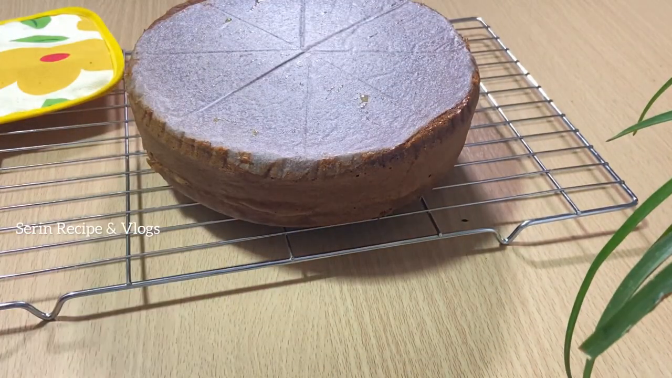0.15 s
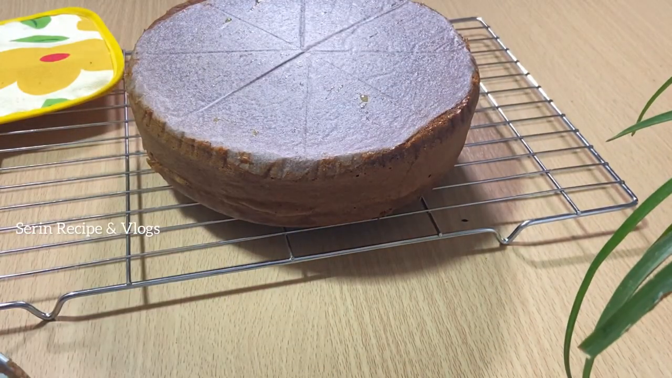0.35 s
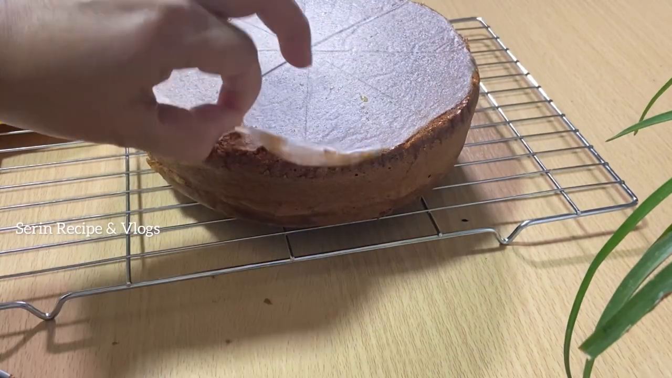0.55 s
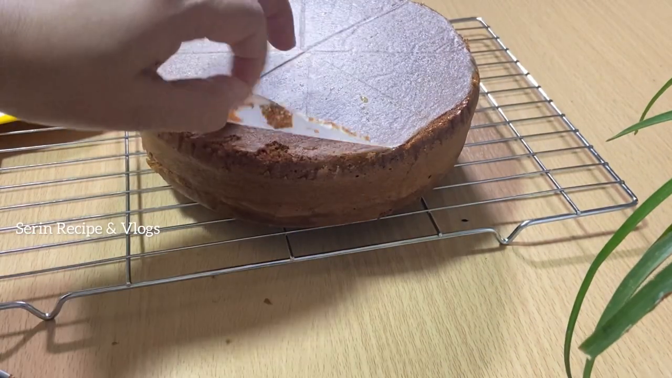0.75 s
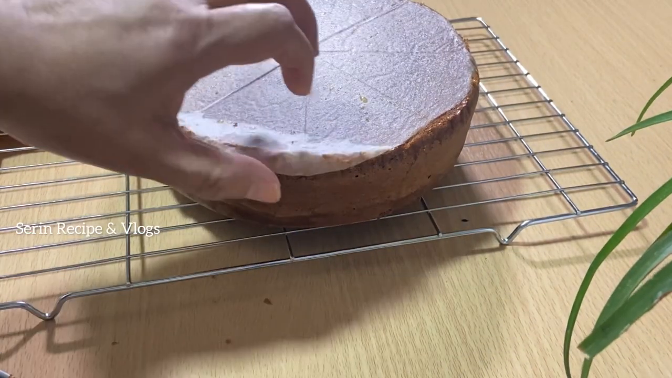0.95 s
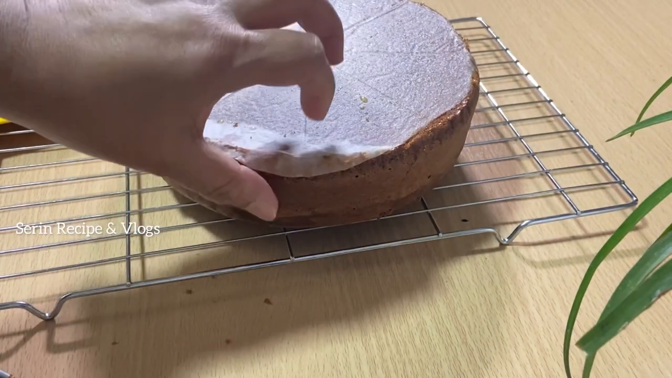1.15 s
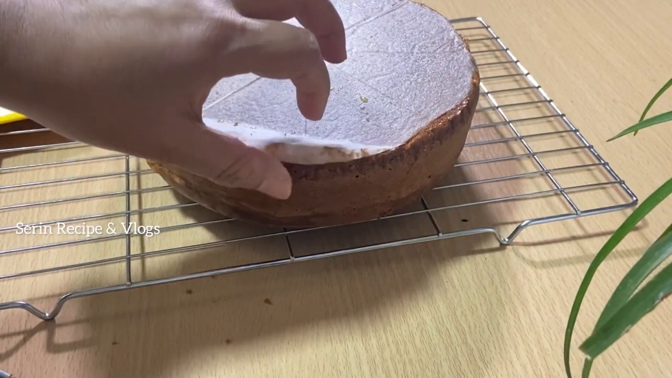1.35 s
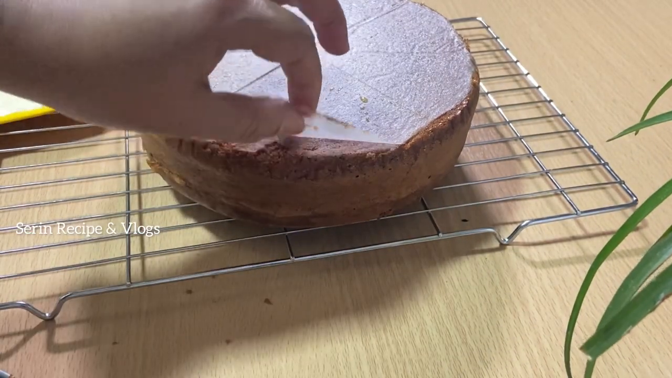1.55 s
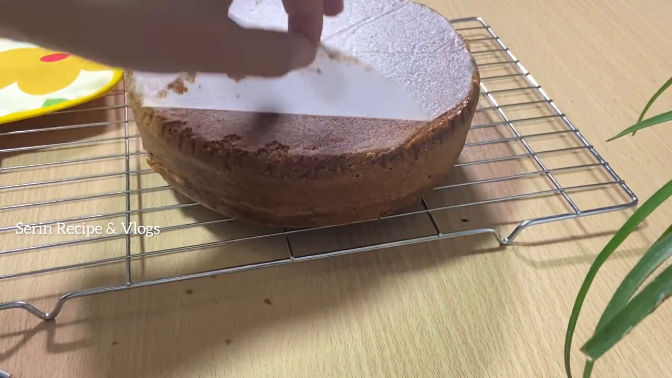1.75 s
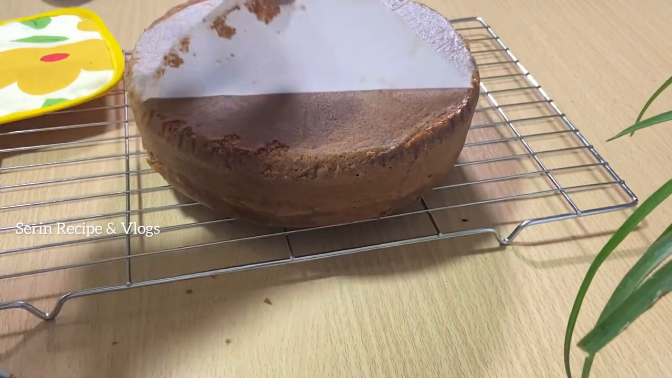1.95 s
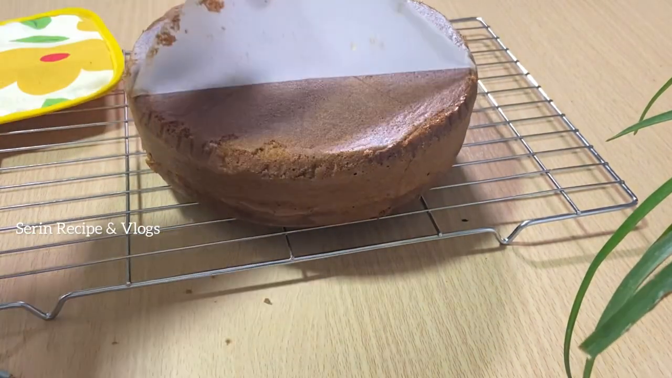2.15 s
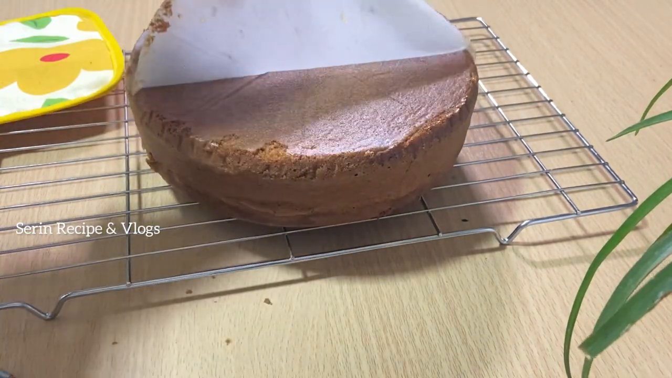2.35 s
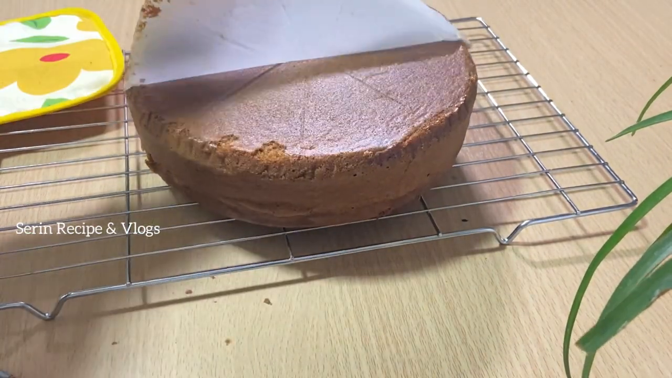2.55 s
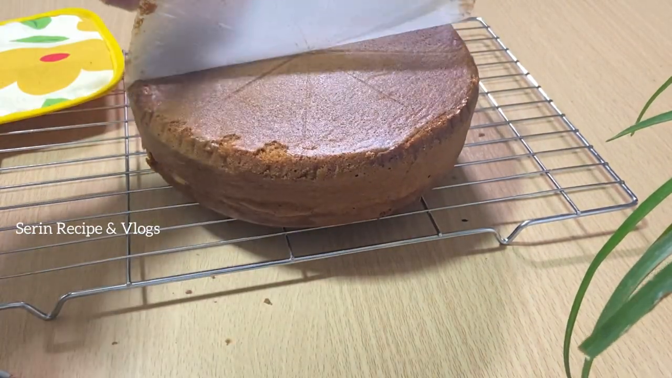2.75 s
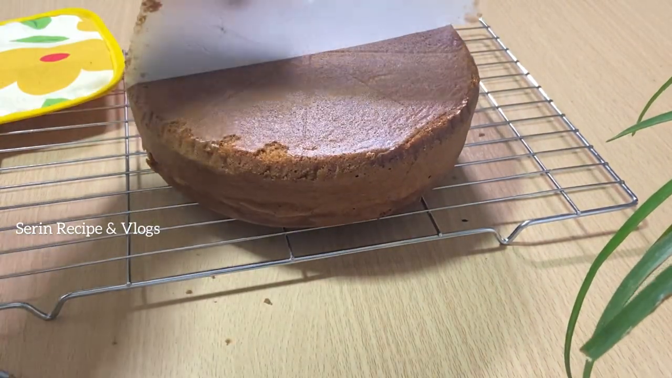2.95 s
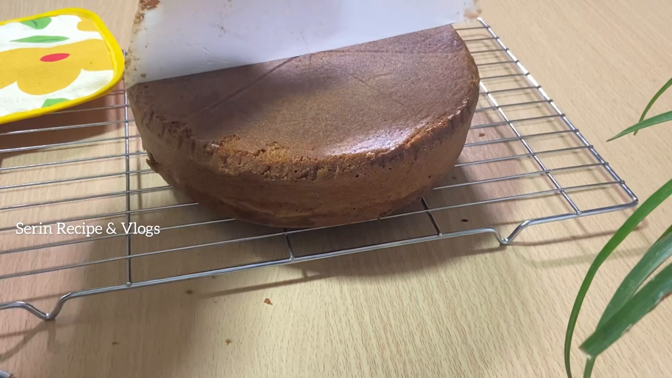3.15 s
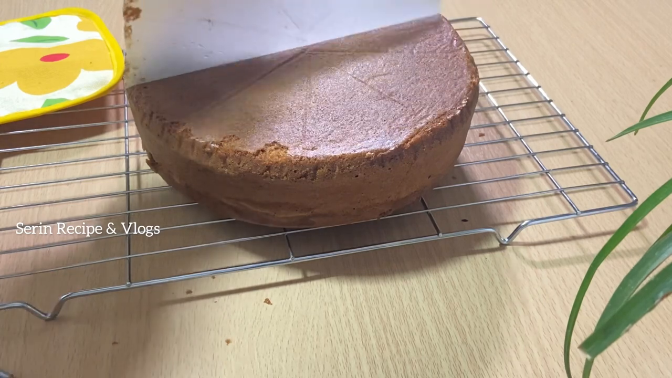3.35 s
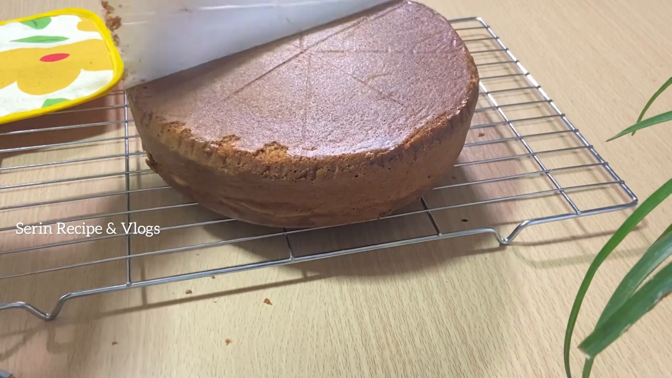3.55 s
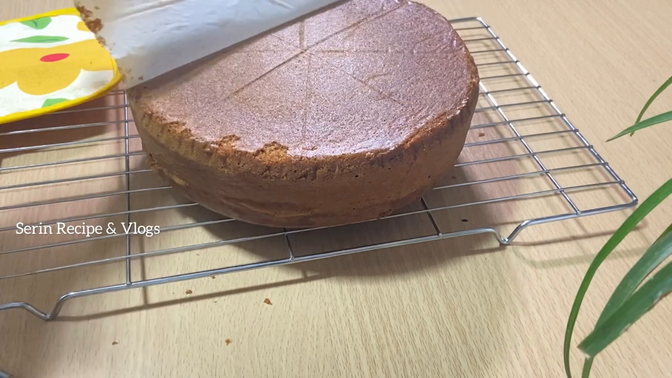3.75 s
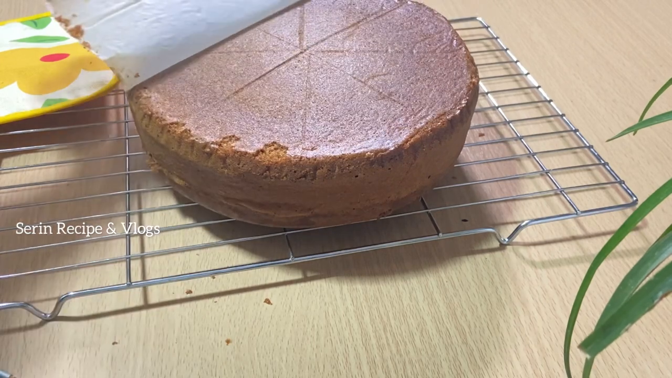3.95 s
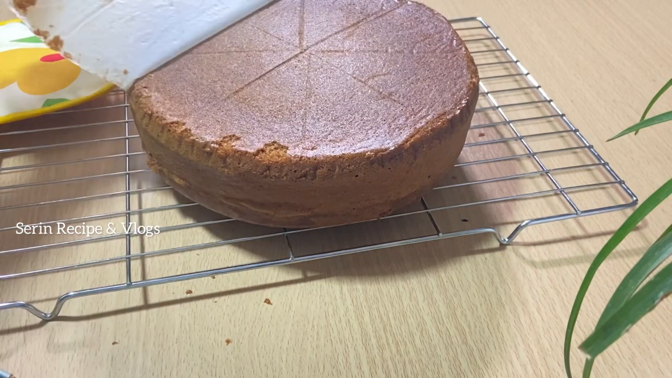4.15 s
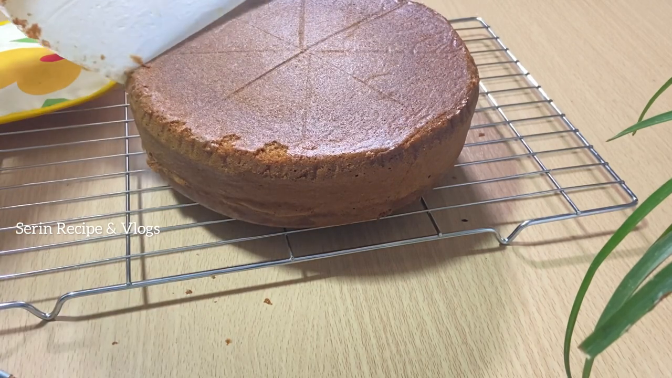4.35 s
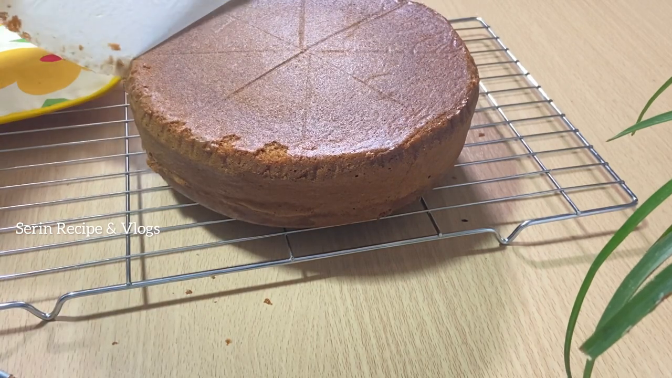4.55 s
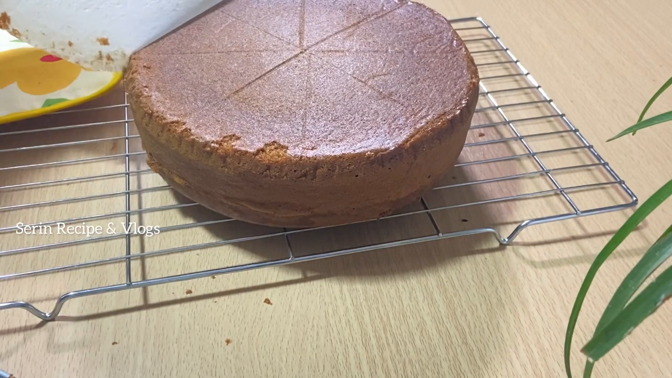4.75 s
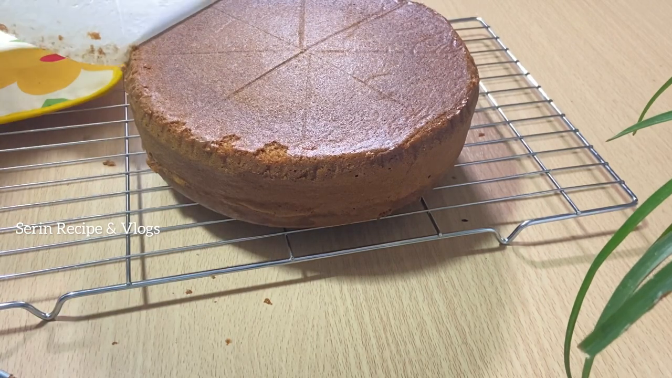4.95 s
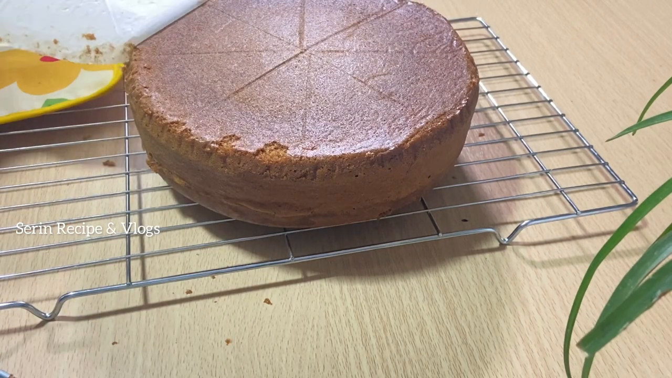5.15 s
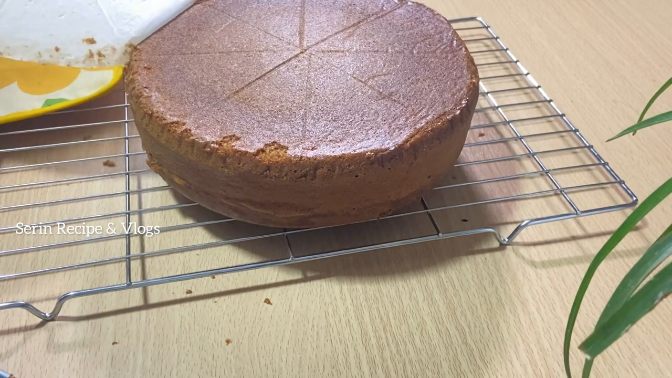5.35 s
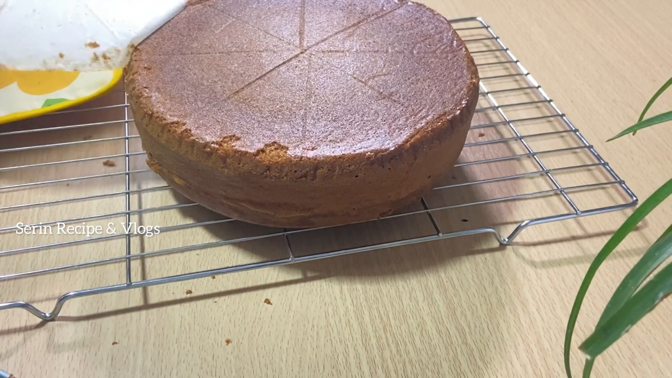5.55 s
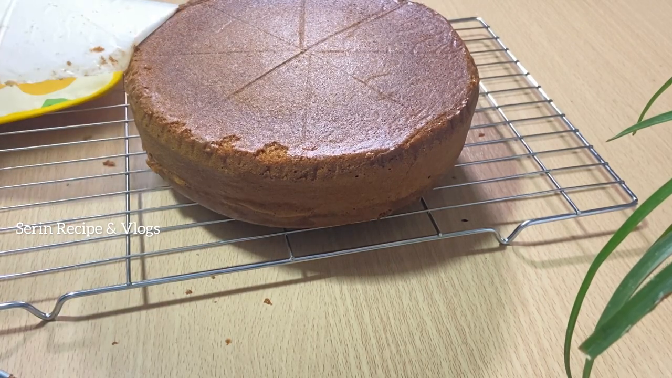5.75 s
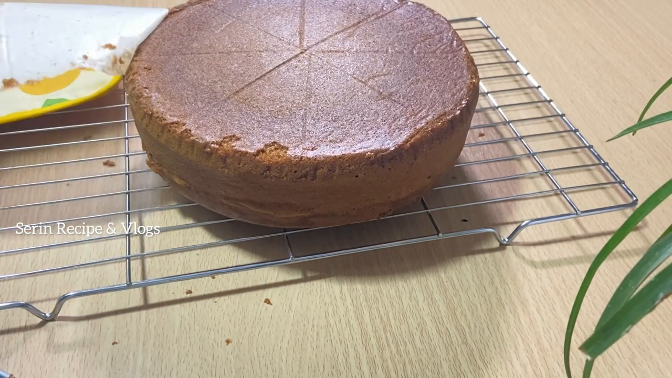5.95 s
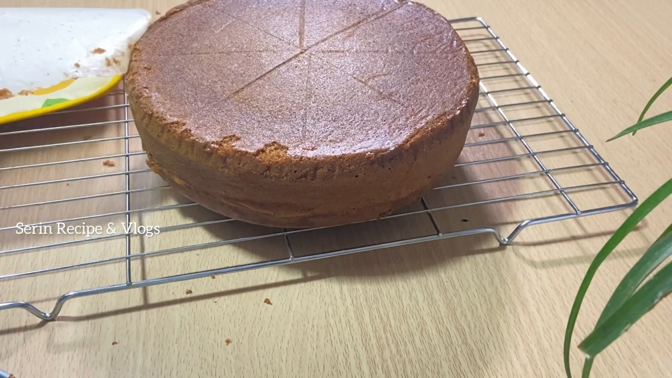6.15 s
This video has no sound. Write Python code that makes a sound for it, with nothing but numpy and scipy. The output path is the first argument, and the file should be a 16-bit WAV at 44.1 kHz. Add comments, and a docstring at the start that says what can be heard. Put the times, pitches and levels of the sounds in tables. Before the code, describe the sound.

Baking paper crackles and rustles close to the microphone as it is pulled from a cake in uneven tugs. It starts after near silence and a brief knock, is busiest in the middle and fades to a few light crinkles. Now and then the table gives a dull thud and the sheet a hollow tap. A fridge hums softly under a low, steady background rumble in the small kitchen.

```python
"""Baking paper is peeled off a cake, close to a two-port microphone in a small kitchen.
The sheet snaps where its creases buckle, and rustles as many tiny stuck spots let go.
The table thuds, hand and sheet make hollow taps, and a fridge hums in soft background noise.
The first half second is hushed and ends on a knock that stops dead; then the sound goes on louder."""
import sys
import numpy as np
from scipy import signal
from scipy.fft import rfft, irfft
from scipy.io import wavfile
from scipy.ndimage import uniform_filter1d

SR = 44100
rng = np.random.default_rng(int(sys.argv[2]) if len(sys.argv) > 2 else 0)


def store_wav(level_fs):
    """Save 16-bit WAV to argv[1]."""
    pcm = np.round(np.clip(np.atleast_2d(level_fs), -1, 1) * 32767)
    wavfile.write(sys.argv[1], SR, pcm.T.astype(np.int16))


N = 277609
TIME, FFT_SIZE = np.arange(N) / SR, 2 ** 19
HUSH_END_S, HUSH_DB = 0.561, -17.5
BODY_HZ, CRISP_HZ = 1120, 8200  # where the paper's low body ends and its crisp top begins

# The tone of the sheet, for snaps and rustle alike: f/Hz, level/dB
PAPER_TONE = [(100, 3), (350, 2.5), (900, -5), (1250, -10.5), (1520, -3), (2700, -2), (3500, -3.5),
              (4400, -3), (6500, -2.5), (11000, -4), (15500, -10)]
# Creases buckling: t/s, peak level of the middle band/dB, ring f/Hz, crisp top against that level/dB
CREASE_SNAPS = [(0.718, -36, 2700, -18), (0.7259, -36.5, 2330, -2), (0.866, -47, 1760, -17),
                (0.953, -58, 4000, -1), (1.0828, -49, 2900, -5), (1.153, -67, 6660, 10),
                (1.2545, -56, 4900, -8), (1.263, -53.5, 1500, -18), (1.3133, -43.5, 4140, -4),
                (1.413, -39, 6800, -9), (1.4223, -35, 4380, -23), (1.5177, -40, 5950, 0.5),
                (1.538, -40, 2980, -23), (1.555, -32, 3030, -19), (1.564, -27.5, 3120, -6),
                (1.5716, -24.5, 3330, -14), (1.752, -39, 2770, -25), (1.785, -36.5, 6450, 6.5),
                (1.8511, -41, 2340, 3.5), (1.9297, -40, 2240, -27), (2.004, -41, 2070, -2),
                (2.0342, -24.5, 4570, 3), (2.1331, -31.5, 2240, -1), (2.1775, -30.5, 2440, 2),
                (2.191, -29.5, 4000, -25), (2.2071, -31, 2090, -25), (2.266, -32.5, 1950, -14),
                (2.283, -22.5, 6560, 3.5), (2.3449, -39, 2330, 6), (2.3928, -24, 5340, -7),
                (2.4124, -28.5, 6400, -2), (2.453, -31.5, 4270, 1.5), (2.4793, -23, 2270, -21),
                (2.5166, -30.5, 2030, -4), (2.5395, -31.5, 4310, 0), (2.583, -34.5, 2930, -4),
                (2.6032, -38, 2930, 4), (2.6123, -26, 3740, -3), (2.6381, -23.5, 5100, -4),
                (2.6465, -21, 3280, 2.5), (2.7935, -38, 4400, 11), (2.8388, -26.5, 2690, -1),
                (3.044, -42, 2420, -34), (3.1657, -36, 2010, -37), (3.183, -54, 1880, -16),
                (3.2092, -35, 2230, -34), (3.215, -42, 2560, -28), (3.238, -37.5, 2600, -33),
                (3.263, -31, 2110, -12), (3.2762, -30, 2220, -24), (3.289, -28, 2820, 0),
                (3.3147, -30.5, 2830, -1), (3.3569, -27.5, 4940, -1), (3.4281, -34.5, 1880, -2),
                (3.488, -31.5, 3030, -1), (3.4936, -28, 2530, 0), (3.5157, -27.5, 2000, -14),
                (3.5428, -27.5, 1950, -25), (3.5625, -27.5, 2200, -9), (3.575, -24, 5970, 3.5),
                (3.5978, -27, 2130, 6.5), (3.6466, -30, 1800, 7), (3.6873, -25.5, 2420, -6.5),
                (3.8323, -39, 4100, 5), (3.8733, -29, 4500, 4.5), (3.9392, -31, 5200, 12.5),
                (3.9529, -29.5, 6600, 0.5), (3.991, -28, 2870, 1), (3.999, -31.5, 2900, 2),
                (4.131, -34, 4540, -12), (4.1651, -27, 6800, -10), (4.2309, -27.5, 7000, 3),
                (4.2454, -27, 4400, -9), (4.2537, -25.5, 3530, -13), (4.27, -30, 6200, -8),
                (4.324, -37.5, 5800, 5.5), (4.4121, -38.5, 6440, 0), (4.59, -38.5, 2800, -15),
                (4.603, -38, 5000, -6), (4.787, -38, 4130, -20), (4.798, -44, 4500, -8),
                (4.828, -39.5, 4230, -1), (4.842, -44, 4500, 1), (5.084, -28, 6100, 2),
                (5.238, -44, 4250, -14), (5.303, -43.5, 4540, 4.5), (5.512, -51.5, 4390, 16.5),
                (5.643, -56.5, 2200, -24), (5.94, -57, 5400, -15), (6.181, -47, 5030, -25),
                (6.205, -35.5, 1560, -19)]
def crease_snaps(ring_db=14, ring_width=0.41, uneven_db=2.5):
    """Each crease lets go in a millisecond and rings near its own pitch; folds colour each one."""
    hz, out = np.fft.rfftfreq(1024, 1 / SR), np.zeros((2, N))
    noises = rng.standard_normal((len(CREASE_SNAPS), 300))
    for (start, peak_db, ring_hz, crisp_db), noise, side in zip(CREASE_SNAPS, noises, sides(len(noises))):
        ring = np.exp(-(np.log((hz + 1) / ring_hz) / ring_width) ** 2)
        folds = np.cos(2 * np.pi * (noise[-1] + (1.5 + noise[-2] / 2) * np.log2(hz + 1)))
        tone_db = curve_at(PAPER_TONE, hz) + ring_db * ring + uneven_db * folds
        body_db = -14.5 - 3 * np.log2(ring_hz / (2 * BODY_HZ))  # higher snaps have less body
        crack = die_away(noise, fade_s=0.00062)
        for share, band_db in zip(three_bands(hz), (body_db, 0, crisp_db)):
            band = np.convolve(crack, shortest_click(tone_db + 20 * np.log10(share + 0.00069)))
            add(out, start, gain_of(peak_db + band_db) * side * band / abs(band).max())
    return out


def tiny_releases(per_s=8000, ticks_per_s=200, tick_db=13.5, spread_db=3, clump_db=2.5, kinds=16):
    """Small releases hiss in clumps and rarer big ones tick; each kind has its own ping."""
    clumps = unit_level(uniform_filter1d(uniform_filter1d(rng.standard_normal(N), 300), 300))
    chance = rng.random(N)
    size_db = spread_db * np.minimum(rng.exponential(1, N), 3.5) + clump_db * clumps
    size_db += tick_db * (chance < ticks_per_s / SR)
    releases = gain_of(size_db) * (chance < per_s / SR)
    kind, out = rng.integers(0, kinds, N), np.zeros((2, N))
    for k, (noise, side) in enumerate(zip(rng.standard_normal((kinds, 256)), sides(kinds))):
        ping_hz = BODY_HZ * (CRISP_HZ / BODY_HZ) ** (k / kinds)
        ping = die_away(np.cos(2 * np.pi * ping_hz * np.arange(256) / SR), fade_s=0.00064)
        click = unit_level(die_away(noise, fade_s=0.0007)) + 1.02 * unit_level(ping)
        out += side * signal.oaconvolve(releases * (kind == k), click)[:N]
    return out


# Pulls on the sheet: t/s, length/s, level/dB, ring of the lifted flap f/Hz, crisp top against level/dB
SHEET_TUGS = [(0.05, 0.078, -70.5, 2770, -3), (0.569, 0.033, -58.5, 3300, -3),
              (0.698, 0.05, -62.5, 2700, -11), (0.752, 0.035, -51.5, 3100, -3),
              (1.081, 0.015, -77, 3900, -13), (1.317, 0.011, -65.5, 4450, -5),
              (1.404, 0.026, -66.5, 4450, -2), (1.515, 0.016, -64.5, 3900, -12),
              (1.564, 0.065, -57, 3150, -1.5), (1.626, 0.27, -65.5, 2760, -4),
              (1.926, 0.031, -62, 2200, -8), (2.03, 0.071, -51.5, 5870, -2.5),
              (2.176, 0.023, -51.5, 4460, -5.5), (2.278, 0.043, -51, 3470, -7),
              (2.391, 0.07, -60, 4970, -8), (2.477, 0.025, -53.5, 2210, -10),
              (2.552, .04, -52.5, 3080, -11), (2.599, 0.051, -44, 1540, -7.5),
              (2.791, 0.0088, -47, 4420, -2.5), (2.938, 0.036, -60.5, 1720, -7.5),
              (3.173, 0.0076, -56, 1620, -50), (3.287, 0.087, -50, 1920, -8.5),
              (3.428, 0.027, -58, 4930, -2), (3.462, 0.079, -53.5, 2560, -8),
              (3.532, 0.051, -44.5, 2250, -13), (3.646, 0.038, -48, 1980, -5),
              (3.723, 0.079, -60.5, 3050, -9), (3.832, 0.069, -58.5, 4940, -3),
              (3.939, 0.12, -52, 5660, -1), (4.156, 0.028, -62, 6000, 0), (4.224, 0.042, -48, 3700, -3),
              (4.332, 0.032, -55, 3420, -7), (4.4, 0.14, -64, 2400, -6), (4.589, 0.039, -62, 3260, -8.5),
              (4.759, 0.081, -59, 4370, -10), (4.892, 0.11, -63, 1770, -10),
              (5.037, 0.097, -59, 6500, -1.5), (5.183, 0.071, -65, 1690, -12),
              (5.262, 0.042, -59.5, 5000, -1.5), (5.376, .16, -67, 4600, -2.5),
              (5.722, 0.39, -68, 5100, -6.5), (5.905, 0.077, -61.5, 5100, -15),
              (6.157, 0.19, -62, 2180, -7.5)]
def tugs(t, rise_db_per_s=1205, fall_db_per_s=206.5):
    """Tugs start fast, hold and settle slowly; they add up, and the strongest sets the flap's pitch."""
    start, length, held_db, flap_hz, crisp_db = np.transpose(SHEET_TUGS)[..., None]
    each_db = held_db - rise_db_per_s * np.maximum(start - t, 0)
    each_db -= fall_db_per_s * np.maximum(t - start - length, 0)
    power = gain_of(2 * np.maximum(each_db, -150))
    crisp_power = power * gain_of(2 * crisp_db)
    return 10 * np.log10(power.sum(0)), flap_hz[each_db.argmax(0), 0], 10 * np.log10(crisp_power.sum(0))


def paper_rustle(flap_db=6, usual_db=-59.5):
    """The tiny releases swell with each tug, and the lifted flap rings as its shape changes."""
    t = np.arange(0, N / SR, 0.001)
    middle_db, flap_hz, crisp_db = tugs(t)
    body_db = usual_db - 2 + 0.49 * (middle_db - usual_db)  # the body swells only half as much
    crackle = tiny_releases()
    crackle += gain_of(flap_db) * resonate(crackle, np.interp(TIME, t, flap_hz), width_hz=800)
    hz, out = np.fft.rfftfreq(FFT_SIZE, 1 / SR), np.zeros((2, N))
    spectrum = rfft(crackle, FFT_SIZE) * gain_of(curve_at(PAPER_TONE, hz))
    for share, band_db in zip(three_bands(hz), (body_db, middle_db, crisp_db)):
        band = irfft(spectrum * share)[:, :N]
        slow_power = abs(uniform_filter1d((band ** 2).mean(0), size=3000))
        steady = band / np.sqrt(slow_power + 1e-20)  # evened out, so the tugs set the level
        out += gain_of(np.interp(TIME, t, band_db)) * steady
    return out


# Low thuds of the table and higher taps of hand and sheet: t/s, level/dB, f/Hz
THUDS_AND_TAPS = [(.79, -52, 346), (1.57, -52.5, 440), (1.705, -50.5, 448), (1.93, -51, 402),
                  (2.092, -37.5, 65.5), (2.199, -42.5, 386), (2.479, -41, 149.5), (3.169, -40, 209),
                  (3.169, -47.5, 556), (3.285, -45.5, 393), (3.335, -47.5, 446), (3.476, -52, 753),
                  (3.757, -51, 579), (4.432, -32.5, 93.4), (4.441, -47, 472), (4.491, -34.5, 87),
                  (4.898, -52.5, 900), (5.12, -39.5, 82), (5.344, -56, 1004), (6.108, -54.5, 836),
                  (6.256, -53.5, 753)]
def thuds_and_taps(tap_above_hz=260, tap_fade_s=0.093, thud_cycles=17.4):
    """Each bump builds up within one swing and fades; loose paper turns higher ones into dull puffs."""
    t, out = np.arange(SR // 3) / SR, np.zeros(N)
    for start, level_db, hz in THUDS_AND_TAPS:
        noise = rng.standard_normal(len(t))
        if hz > tap_above_hz:
            puff = unit_level(resonate(noise, np.full(len(t), hz), width_hz=0.8 * hz))
            swing, fade_s = np.cos(2 * np.pi * hz * t) + puff, tap_fade_s
        else:
            swing, fade_s = np.sin(2 * np.pi * hz * t), thud_cycles / hz
        build_up = 1 - np.exp(-1.5 * hz * t)
        add(out, start, gain_of(level_db - 60 * t / fade_s) * build_up * swing)
    return out


# The notes that ring in the knock: f/Hz, relative level/dB, time to fade by 60 dB/s
KNOCK_NOTES = [(315, -10, 0.18), (900, -14, 0.22), (1480, -1.5, 0.11), (2400, 6, 0.055), (4450, 3, 0.032),
               (6840, 4, 0.012), (9800, 5.5, 0.021)]
def knock(start=0.5397, level_db=-27.5):
    """A blow and a quick bounce on a small hard thing; the ring stops dead as the hush ends."""
    t, out = np.arange(SR // 10) / SR, np.zeros(N)
    ring = sum(gain_of(db - 60 * t / fade_s) * np.sin(2 * np.pi * hz * t)
               for hz, db, fade_s in KNOCK_NOTES)
    dull_rattle = signal.lfilter([0.5], [1, -0.8], die_away(rng.standard_normal(len(t)), fade_s=0.02))
    blow = ring / abs(ring).max() + 0.39 * dull_rattle
    add(out, start, gain_of(level_db) * blow)
    add(out, start + 0.0036, gain_of(level_db - 16) * blow)  # the bounce
    return out * (TIME < HUSH_END_S)


def fridge_hum(hz=99.8, waver_hz=29, level_db=-55.5):
    """The fridge holds one low note that wavers at random."""
    smoothing = [1, -np.exp(-np.pi * waver_hz / SR)]
    noise = rng.standard_normal(N) + 1j * rng.standard_normal(N)
    waver = signal.lfilter([1], smoothing, signal.lfilter([1], smoothing, noise))
    hum = (2.2 + waver / abs(waver).mean()) * np.exp(2j * np.pi * hz * TIME)
    return gain_of(level_db) * unit_level(hum.real)


# The tone of the steady background noise, with its highest hiss cut away: f/Hz, relative level/dB
NOISE_TONE = [(25, -35.5), (40, -2.5), (60, -1), (104, -13.5), (163, -11.5), (320, -16.5), (520, -28.5),
              (1090, -39), (2600, -42.5), (6500, -52.5), (12000, -55), (14000, -68.5)]
# How alike that noise is on the left and right: f/Hz, likeness (1 = the same)
NOISE_LIKENESS = [(60, 1), (1200, 0.55), (3000, 1)]
def background_noise(level_db=-59.5):
    """A soft, steady rumble with a faint hiss, mostly shared by both sides."""
    frames, hz = N // 1024 + 5, np.fft.rfftfreq(4096, 1 / SR)
    real, imaginary = rng.standard_normal((2, 2, len(hz), frames))
    left, other = real + 1j * imaginary
    right = blend(left, other, curve_at(NOISE_LIKENESS, hz)[:, None])
    spectrum = np.array([left, right]) * gain_of(curve_at(NOISE_TONE, hz))[:, None]
    noise = signal.istft(spectrum, nperseg=4096, noverlap=3072)[1][:, :N]
    return gain_of(level_db) * unit_level(noise)


# How long the kitchen rings: f/Hz, time to fade by 60 dB/s
ECHO_FADES = [(300, 0.26), (16000, 0.09)]
def kitchen_echo(sound, level_db=-10):
    """Many small echoes, partly shared by both sides, blur into a tail whose highs die first."""
    echoes = np.zeros((2, SR // 2))
    arrivals = np.arange(80, SR // 2 - 20, 20)  # in samples
    arrivals = arrivals + rng.integers(0, 20, (2, len(arrivals)))
    np.put_along_axis(echoes, arrivals, rng.choice([-1., 1.], arrivals.shape), 1)
    echoes[1] = blend(echoes[0], echoes[1], likeness=0.3)
    hz, t, spectrum = signal.stft(echoes, SR, nperseg=256)
    fade = gain_of(-60 * t / curve_at(ECHO_FADES, hz)[:, None])
    tail = signal.istft(spectrum * fade, SR, nperseg=256)[1]
    tail *= gain_of(level_db) / np.linalg.norm(tail[0])
    return signal.fftconvolve(sound[None], tail, axes=1)[:, :N]


def gain_of(db):
    return 10 ** (np.asarray(db) / 20)


def unit_level(sound):
    return sound / np.sqrt(np.mean(sound ** 2) + 1e-20)


def curve_at(points, hz):
    point_hz, values = np.transpose(points)
    return np.interp(np.log(hz + 1), np.log(point_hz + 1), values)


def add(mix, start_s, sound):
    part = mix[..., round(start_s * SR):][..., :sound.shape[-1]]
    part += sound[..., :part.shape[-1]]


def die_away(sound, fade_s):
    return sound * np.exp(-np.arange(len(sound)) / SR / fade_s)


def blend(shared, other, likeness):
    return likeness * shared + np.sqrt(1 - likeness ** 2) * other


def shortest_click(tone_db):
    """The shortest click that has the given level at each frequency."""
    log_gain = np.log(gain_of(np.maximum(np.r_[tone_db, tone_db[-2:0:-1]], -100)))
    return np.fft.ifft(np.exp(np.conj(signal.hilbert(log_gain)))).real[:len(tone_db)]


def three_bands(hz):
    """Shares each frequency out between the body, the middle and the crisp top."""
    body = 1 / (1 + (hz / BODY_HZ) ** 8)
    crisp = 1 - 1 / (1 + (hz / CRISP_HZ) ** 8)
    return body, np.maximum(1 - body - crisp, 0), crisp


def resonate(sound, hz, width_hz):
    """Rings at a pitch that can move: shifts that pitch to zero, smooths, and shifts back."""
    turn = np.exp(2j * np.pi * np.cumsum(hz) / SR)
    decay = np.exp(-np.pi * width_hz / SR)
    return 2 * (turn * signal.lfilter([1 - decay], [1, -decay], sound / turn)).real


def sides(count, spread_db=3):
    """Left and right gains for random places along the peeling edge."""
    return gain_of(spread_db * rng.uniform(-1, 1, (count, 1, 1)) * np.array([[-1], [1]]))


def scene():
    """Paper and its echo over the bumps and the background; rustle and background start hushed."""
    hush = gain_of(HUSH_DB * (TIME < HUSH_END_S))
    paper = hush * paper_rustle() + crease_snaps()
    mix = paper + kitchen_echo(paper.mean(0)) + thuds_and_taps() + knock()
    return mix + hush * (background_noise() + fridge_hum())


# How far the wave at the left port runs ahead of the right: f/Hz, phase/rad
LEFT_LEAD = [(0, 0), (1500, .62), (3100, .45), (4200, .05), (7100, 0), (9050, -3.14), (11200, -6.3),
             (13280, -9.42), (15200, -12.5), (17000, -12.7)]
# How much louder the left port is: f/Hz, level/dB
LEFT_LOUDER = [(60, 0), (270, 1.2), (900, 2.2), (5500, 2.3), (7300, .4), (15000, .2)]
def record(dry, top_hz=16150):
    """The microphone's two ports (openings) differ in timing and level; the highest treble is cut."""
    hz = np.fft.rfftfreq(FFT_SIZE, 1 / SR)
    lead = np.interp(hz, *np.transpose(LEFT_LEAD))
    tilt = gain_of(curve_at(LEFT_LOUDER, hz) / 2)
    ports = irfft(rfft(dry, FFT_SIZE) * np.array([tilt, np.exp(-1j * lead) / tilt]))[:, :N]
    low_pass = signal.firwin(255, top_hz, window=("kaiser", 9), fs=SR)
    return signal.oaconvolve(ports, low_pass[None], "same")


dry = scene()
out = record(dry)
store_wav(out)
```